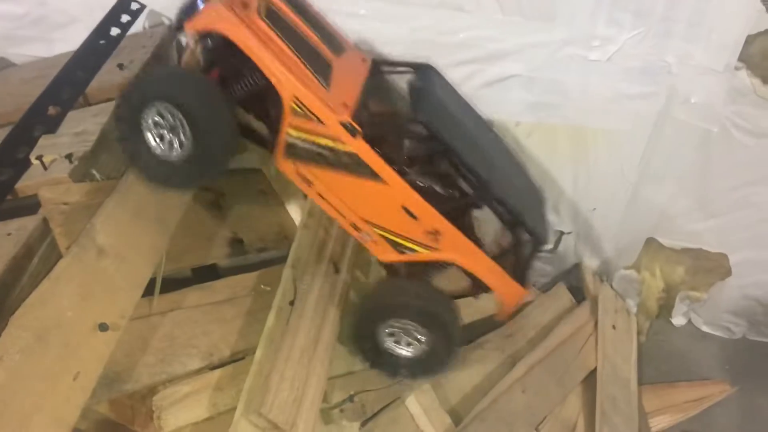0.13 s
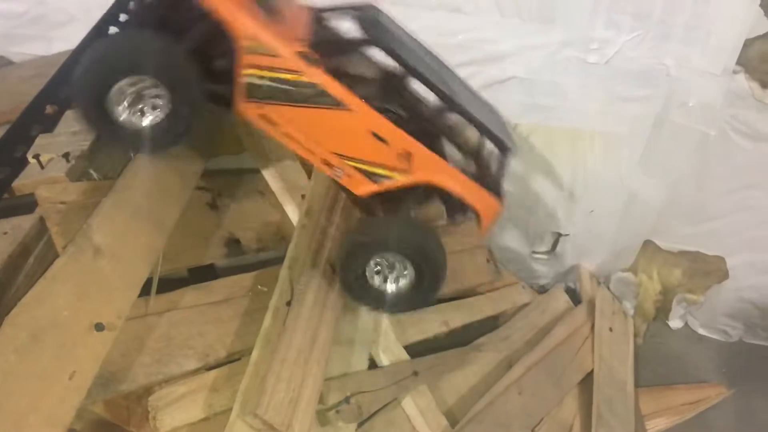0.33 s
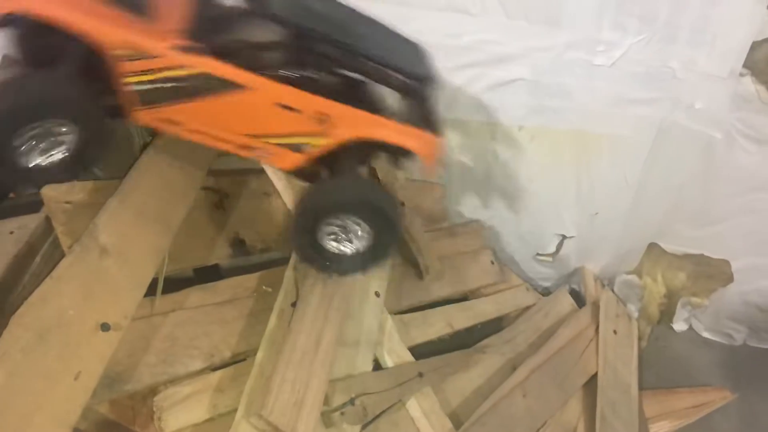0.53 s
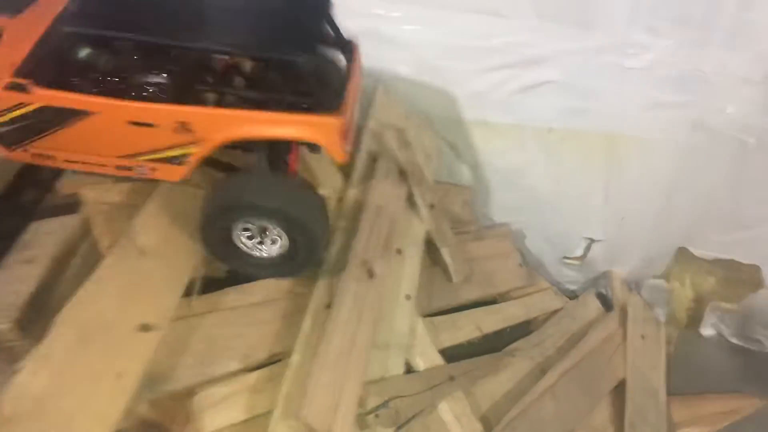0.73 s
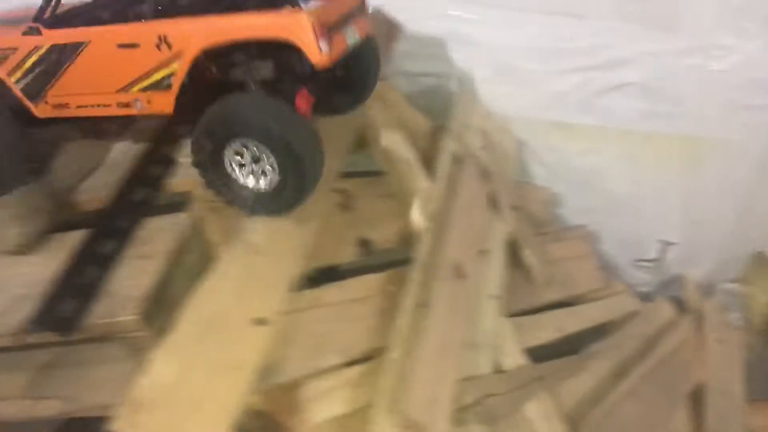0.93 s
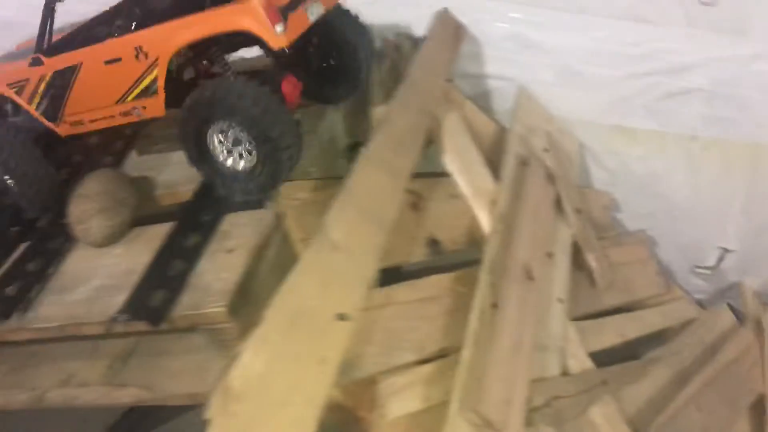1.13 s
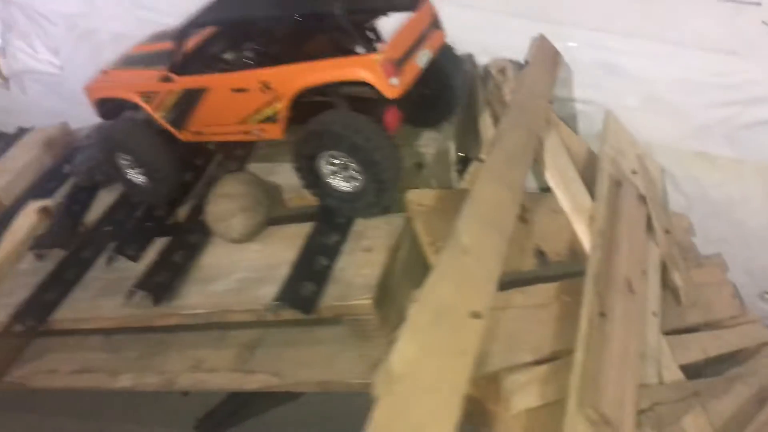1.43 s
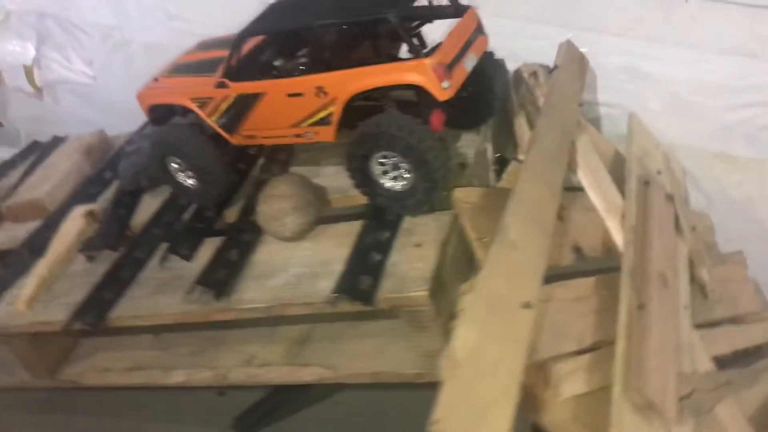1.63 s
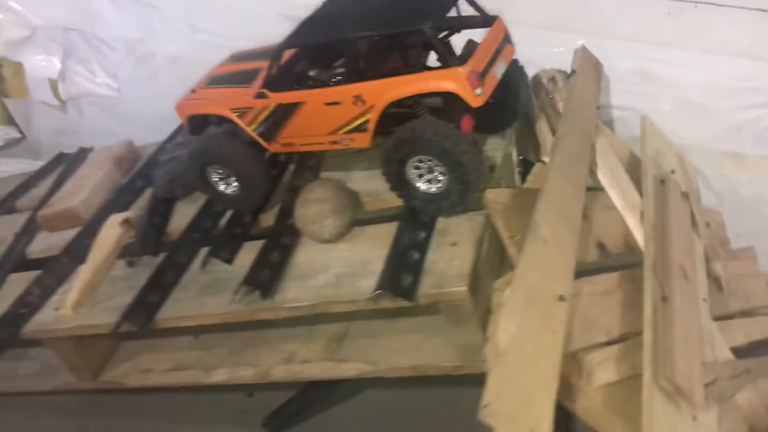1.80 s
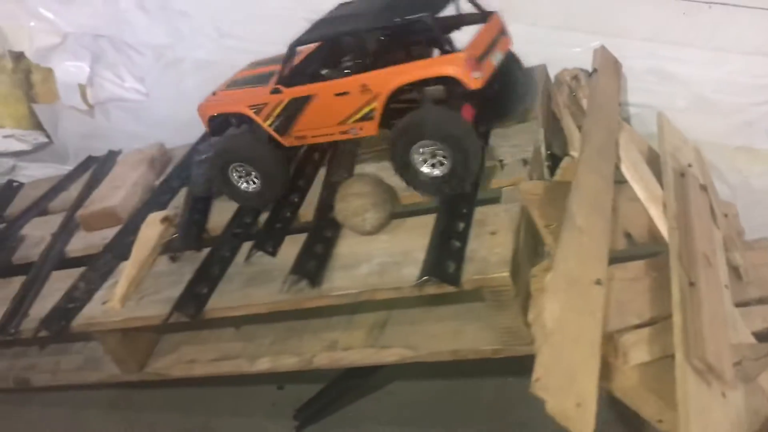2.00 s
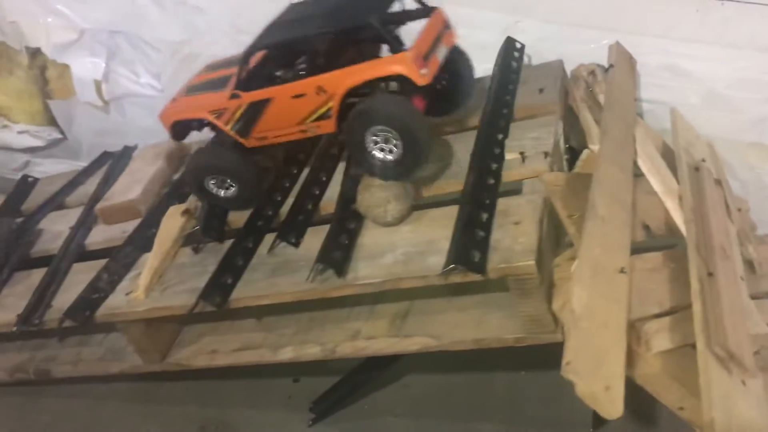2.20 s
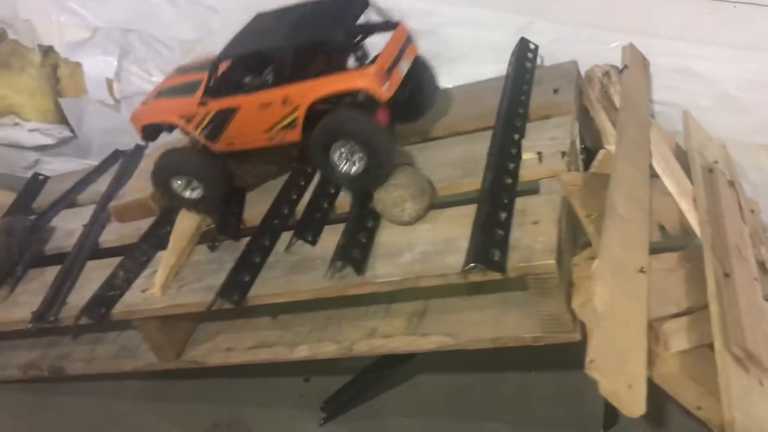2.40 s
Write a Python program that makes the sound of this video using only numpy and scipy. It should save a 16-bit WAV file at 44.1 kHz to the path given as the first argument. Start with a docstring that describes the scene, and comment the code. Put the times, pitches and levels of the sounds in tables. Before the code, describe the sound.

A toy truck's small motor and plastic gears whine and rattle unevenly, sag and wind down amid wooden knocks; after a quiet pause with a faint scuff, it restarts and clatters on boards, close in a basement.

```python
"""In a basement, a toy crawler climbs a heap of wooden offcuts, heard direct with a short room behind it.
Its motor and gears whine and rattle, sagging under load, then wind down; the truck drops onto the boards.
It rests with a brief scuff, starts again with a thin controller whistle and knocks against the blocks.
Gears are tones at the mesh rate plus random clashes; knocks are showers of clicks through filters and
ringing modes; tyres, scuff and air are filtered noise."""
import sys
import numpy as np
from scipy import signal
from scipy.fft import rfft, irfft
from scipy.io import wavfile

SR = 44100
rng = np.random.default_rng(int(sys.argv[2]) if len(sys.argv) > 2 else 0)


def materialize(psi):
    """Save the field psi as 16-bit PCM at rate SR to the path in sys.argv[1].

    A 1-D psi becomes a single channel; in a 2-D psi each row is a channel.
    """
    bounded = np.clip(np.atleast_2d(psi).T, -1, 1)
    quanta = np.round(bounded * 32767).astype(np.int16)
    wavfile.write(sys.argv[1], SR, quanta)


N = 112454
T = np.arange(N) / SR


def amp(db):
    """Decibels to gain."""
    return 10 ** (np.asarray(db) / 20)


def unit(x):
    """Scales to an rms of one."""
    return x / np.sqrt(np.mean(x ** 2) + 1e-20)


def read(points, hz):
    """Reads a curve on a log-frequency axis."""
    f, value = np.transpose(points)
    return np.interp(np.log(hz + 1), np.log(f + 1), value)


def add(mix, s, sound):
    """Mixes a sound in at time s."""
    part = mix[max(0, round(s * SR)):][:len(sound)]
    part += sound[:len(part)]


def noise():
    """White noise as long as the scene."""
    return rng.standard_normal(N)


def wander(hz):
    """Slow chance below about hz, with an rms of one."""
    low_pass = 1 + (np.fft.rfftfreq(N, 1 / SR) / hz) ** 4
    return unit(irfft(rfft(noise()) / low_pass, N))


def colour(x, points, size=4096):
    """Causal (minimum-phase) filter of unit energy with the shape of the given spectrum."""
    log_gain = np.log(amp(read(points, abs(np.fft.fftfreq(size, 1 / SR)))))
    spectrum = np.exp(np.conj(signal.hilbert(log_gain)))
    taps = np.fft.ifft(spectrum).real[:size // 2]
    return signal.fftconvolve(x, taps / np.linalg.norm(taps))[:N]


def ring(x, modes):
    """Rings a set of damped modes, with unit energy."""
    t = T[:SR // 3]
    taps = sum(amp(db - 60 * t / t60) * np.sin(2 * np.pi * hz * t) for hz, db, t60 in modes)
    return signal.fftconvolve(x, taps / np.linalg.norm(taps))[:N]


# multiples of the gear mesh rate, from the first up: relative level_db
MESH_MULTIPLES = [-1, 1, -7, -10.5]
# gearbox and shell resonances the whine sings through: freq_hz, gain_db
SHELL_COLOUR = [(700, -20), (1200, -0.5), (1450, 7), (1850, -31.5), (2100, 5), (2280, 3.5), (2700, -10),
                (3550, -1.5), (3900, -16), (4500, -4)]
# second gear stage, heard as its rate glides through the shell: freq_hz, gain_db
SECOND_STAGE_COLOUR = [(750, -24), (1020, 0), (1130, -18)]
SECOND_STAGE_RATIO = .94  # its rate as a share of the mesh rate
SIDEBANDS, BLUR = .18, .08  # phase wobble, radians before scaling
FLUTTER_DB = 2  # rms level flutter of each multiple


def gear_whine(hz, mesh, shaft):
    """Meshing teeth sound multiples of the mesh rate; shaft wobble adds sidebands; a second stage joins in."""
    wobble = SIDEBANDS * (np.sin(shaft) + wander(hz=233))
    whine = np.zeros(N)
    for k, db in enumerate(MESH_MULTIPLES, 1):
        level_db = db + read(SHELL_COLOUR, k * hz) + FLUTTER_DB * wander(hz=95)
        phase = k * (mesh + wobble / 2 + BLUR * wander(hz=146))
        whine += amp(level_db) * np.sin(phase)
    second_level = amp(read(SECOND_STAGE_COLOUR, SECOND_STAGE_RATIO * hz))
    return whine + second_level * np.sin(SECOND_STAGE_RATIO * mesh)


WEAR_FLUTTER_DB = 10  # greatest rise or fall of one shaft multiple


def worn_teeth(shaft, count=56):
    """Uneven teeth repeat every turn: a comb of shaft multiples glides with the speed, each swelling and fading."""
    comb = np.zeros(N)
    for k in range(2, count):
        flutter = amp(WEAR_FLUTTER_DB * np.tanh(wander(hz=29) / 2))
        comb += flutter * np.sin(k * shaft + 2 * np.pi * rng.random())
    return comb


# colour of clashing teeth: freq_hz, gain_db
TEETH_COLOUR = [(150, -29), (600, -12.5), (850, -5), (1500, 0), (1850, -7.5), (2400, -3), (3100, -7),
                (4300, -8.5), (5600, -11), (7400, -20.5), (8600, -18), (10500, -24), (15500, -36)]
CLASH_PER_S, CLASH_DB = 2600, 3.  # mean rate; random extra level, mean before a cap at three times this
TURN_DEPTH = .4  # swell of the clashes over one shaft turn
WEAR_DB, LURCH_DB = 2, 1.2  # worn-tooth comb relative to the clashes; rms level flutter of both


def gear_rattle(shaft):
    """Teeth clash at random, swelling once per shaft turn, over the buzz of their wear."""
    clashes = (rng.random(N) < CLASH_PER_S / SR) * rng.choice([-1, 1], N)
    clashes = clashes * amp(CLASH_DB * np.minimum(rng.exponential(1, N), 3))
    clashes *= 1 + TURN_DEPTH * np.sin(shaft)
    buzz = amp(WEAR_DB) * unit(colour(worn_teeth(shaft), TEETH_COLOUR))
    return unit((unit(colour(clashes, TEETH_COLOUR)) + buzz) * amp(LURCH_DB * wander(hz=42.0)))


# the drive as load and throttle change: time_s, mesh_hz, whine_db (before the truck's gain)
DRIVE_COURSE = [(0, 1026, -26.5), (.04, 1151, -34), (.068, 1177, -21.5), (.082, 1118, -34),
                (.125, 1018, -47), (.152, 1123, -26.5), (.17, 1128, -38.5), (.188, 1102, -29.5),
                (.24, 966, -39.5), (.28, 1122, -28.5), (.31, 1069, -36.5), (.355, 909.5, -45),
                (.385, 1081, -32.5), (.41, 1121, -25.5), (.44, 1031, -38.5), (.472, 968, -41),
                (.503, 1108, -28.5), (.555, 1180, -30.5), (.582, 1194, -23), (.625, 1132, -53.5),
                (.672, 1196, -23.5), (.7, 1146, -33.5), (.718, 1094, -28.5), (.738, 1177, -42),
                (.78, 1224, -24.5), (.82, 1029, -43), (.838, 830, -26.5), (.863, 710.7, -28.5),
                (.88, 678, -40), (.925, 629.5, -34.5), (.955, 572, -34.5), (1.0, 501, -47),
                (1.07, 578, -37), (1.125, 669.7, -36), (1.16, 698.8, -47.5), (1.2, 605, -37),
                (1.8, 348.4, -130), (1.97, 479.2, -59), (2.01, 689, -39.5), (2.021, 725.3, -32),
                (2.055, 810.7, -34), (2.17, 868, -39), (2.34, 617.3, -54), (2.43, 671, -41.5),
                (2.55, 643, -87)]
# rattle of the gear train: time_s, level_db (before the truck's gain)
RATTLE_COURSE = [(0, -30.5), (.08, -31), (.3, -30), (.36, -34), (.42, -29), (.475, -32.5), (.6, -29),
                 (.83, -32), (.96, -40), (1.0, -46.5), (1.12, -40), (1.2, -39), (1.38, -60), (1.81, -66),
                 (1.85, -58.5), (1.975, -51.5), (2.02, -38), (2.1, -38.5), (2.17, -38), (2.42, -43),
                 (2.49, -33), (2.55, -45.5)]
TEETH = 6  # mesh cycles per shaft turn
JITTER = .005  # rms share of the mesh rate


def drive():
    """Motor speed sets the mesh and shaft phases; whine and rattle follow their own level courses."""
    time_s, mesh_hz, whine_db = np.transpose(DRIVE_COURSE)
    hz = np.interp(T, time_s, mesh_hz) * (1 + JITTER * wander(hz=118.5))
    mesh = 2 * np.pi * np.cumsum(hz) / SR
    shaft = mesh / TEETH
    whine = gear_whine(hz, mesh, shaft) * amp(np.interp(T, time_s, whine_db))
    return whine + gear_rattle(shaft) * amp(np.interp(T, *np.transpose(RATTLE_COURSE)))


# bright plastic colour of grit, and of snaps in the knocks: freq_hz, gain_db
PLASTIC_COLOUR = [(1000, -25), (3000, -8), (5500, -2), (8000, -3), (12000, 0), (15500, -3)]
GRIT_PER_S, GRIT_DB = 940, -18  # mean rate; level relative to the gear rattle
GRIT_SPREAD_DB, GRIT_CLUMP_DB = -10, 5  # mean drop of a tick; greatest swell of a clump


def grit():
    """Links and shell scrape and tick in clumps, as hard as the drive shakes them."""
    ticks = (rng.random(N) < GRIT_PER_S / SR) * amp(GRIT_SPREAD_DB * rng.exponential(1, N))
    scrapes = signal.fftconvolve(ticks, np.exp(-T / 0.0019))[:N] * noise()
    clumps = scrapes * amp(GRIT_CLUMP_DB * np.tanh(wander(hz=12)))
    level_db = np.interp(T, *np.transpose(RATTLE_COURSE)) + GRIT_DB
    return unit(colour(clumps, PLASTIC_COLOUR)) * amp(level_db)


CLATTER_PER_S = 2700  # mean rate of rebounds


def clatter(length, size=8192):
    """A contact followed by a dying shower of small rebounds, with the same energy at any length."""
    t = np.arange(size) / SR
    fade = np.exp(-(t / length) ** 2 / 2)
    hits = rng.choice([-1, 1], size) * (rng.random(size) < CLATTER_PER_S / SR) * fade
    hits[0] = 1.0
    return hits / np.linalg.norm(hits) * np.sqrt(SR / 50)


# knocks of chassis and wheels, drive levels into the filters:
# start_s, strike_db, thud_db, snap_db, clatter_length_s, part_pitch_hz, part_db
KNOCK_LIST = [(.003, -29.5, -71, -67, 0.033, 1203, -27), (0.087, -32.5, -76, -68, 0.0098, 1230, -30.5),
              (0.449, -29.5, -69, -50, 0.016, 1965, -33), (0.608, -32, -36.5, -36, 0.012, 610, -43),
              (0.798, -35.5, -40.5, -42, 0.013, 1110, -38), (1.039, -32.5, -38.5, -63, 0.018, 1116, -32.5),
              (1.079, -31, -35.5, -49, 0.022, 1815, -26), (1.208, -37.5, -66, -49, 0.0059, 2664, -55),
              (1.229, -31, -34.5, -34, 0.017, 724, -41.5), (1.831, -61, -79, -66, 0.0053, 1404, -54),
              (1.98, -66, -71, -71, 0.0097, 1498, -47.5), (2.199, -31.5, -33, -48, 0.013, 504, -42),
              (2.211, -21.5, -29.5, -43, 0.032, 3170, -29), (2.368, -30, -40, -53, 0.022, 980, -39),
              (2.413, -29.5, -41.5, -48.5, 0.024, 1349, -37), (2.46, -33.5, -34, -49, 0.065, 1041, -39)]
# light ticks of plastic, halved when played: start_s, level_db
TICK_LIST = [(.257, -36.5), (0.614, -33), (.864, -44), (1.019, -39), (1.056, -37), (1.096, -36),
             (1.271, -41.5), (2.012, -62), (2.073, -55), (2.157, -46), (2.172, -45), (2.547, -34.5)]
# chassis strike: freq_hz, gain_db
STRIKE_COLOUR = [(200, -37), (500, -12), (1700, 3.5), (2400, -1.5), (4300, -2), (6000, -10), (9000, -19),
                 (15000, -84)]
# board thud: freq_hz, gain_db
THUD_COLOUR = [(40, -62), (90, -12), (260, -5), (800, -5.5), (1500, -36.5), (4000, -59)]
# ring of the boards: pitch_hz, relative level_db, t60_s
BOARD_MODES = [(292, -3, 0.1), (468, -4, 0.052), (725, 4.5, 0.14), (1719, 12, 0.094), (2710, 7, 0.041),
               (5010, 11.5, 0.08)]
BOARD_RING_DB = -10.5
PART_SPREAD, PART_T60_S = .09, .05  # pitch step as a share of the part's pitch; its ring


def knocks():
    """Each knock rattles the chassis, rings the struck part, thuds in the boards and snaps the plastic shell."""
    strike, thud, snap, parts = np.zeros((4, N))
    for s, strike_db, thud_db, snap_db, length, pitch_hz, part_db in KNOCK_LIST:
        add(strike, s, amp(strike_db) * clatter(length))
        add(thud, s, amp(thud_db) * clatter(length))
        add(snap, s, amp(snap_db) * clatter(length))
        cluster = [(pitch_hz * (1 + PART_SPREAD * k), 0, PART_T60_S) for k in (-1, 0, 1)]
        add(parts, s, amp(part_db) * ring(clatter(length / 2), cluster))
    for s, db in TICK_LIST:
        add(snap, s, amp(db) * clatter(0.0055) * .5)
    chassis = colour(strike, STRIKE_COLOUR)
    boards = amp(BOARD_RING_DB) * ring(strike, BOARD_MODES)
    return chassis + boards + parts + colour(thud, THUD_COLOUR) + colour(snap, PLASTIC_COLOUR)


# tyres bumping over board edges: peak_s, level_db (before the truck's gain), length_s
BUMP_LIST = [(0.066, -51, 0.025), (0.297, -50, 0.081), (0.619, -41, 0.031), (0.817, -48, 0.048),
             (0.92, -54, 0.12), (1.261, -54, 0.093), (2.171, -46, 0.034), (2.452, -49.5, 0.073)]
# low rumble of the rubber: freq_hz, gain_db
TYRE_COLOUR = [(35, -16), (70, -3), (105, -0.5), (145, 2), (190, -5.5), (400, -8), (900, -62)]


def tyres():
    """Rubber lugs rumble on loose boards: low noise swelling around each bump."""
    level = sum(amp(db) * np.exp(1 - np.hypot(1, (T - s) / length)) for s, db, length in BUMP_LIST)
    return unit(colour(noise(), TYRE_COLOUR)) * level


# pings of the steel rails under the truck: start_s, pitch_hz, level_db (before the truck's gain), t60_s
PING_LIST = [(.086, 3970, -32.5, 0.11), (0.319, 2930, -22, 0.04), (1.04, 2660, -26, 0.14)]


def rails():
    """A grazed steel rail rings on one short note."""
    out = np.zeros(N)
    for s, hz, db, t60 in PING_LIST:
        add(out, s, amp(db - 60 * T / t60) * np.sin(2 * np.pi * hz * T))
    return out


# controller whistle: start_s, end_s, level_db (before its flutter)
WHISTLE_LIST = [(.84, 1.2, -61), (1.78, 1.93, -74), (1.92, 2.12, -64)]
SWITCH_HZ = 8000


def controller():
    """The motor windings whistle at the controller's switching rate, with a fluttering level."""
    level = np.zeros(N)
    for start, end, db in WHISTLE_LIST:
        level += amp(db) * np.clip(np.minimum(T - start, end - T) / 0.01, 0, 1)  # 10 ms fades
    return level * amp(5.15 * wander(hz=59.95)) * np.sin(2 * np.pi * SWITCH_HZ * T)


# hiss of the scuff: freq_hz, gain_db
SCUFF_COLOUR = [(1500, -12), (2700, -7), (4800, -10), (6100, 6), (7600, -18), (9500, -11.5), (15500, -27)]
SCUFF_S, SCUFF_DB = 1.6675, -38.5  # peak time; level before the truck's gain
SCUFF_RISE_S, SCUFF_FALL_S = 0.015, 0.015


def scuff():
    """A brief hiss, as of a tyre slipping while the truck settles."""
    width = np.where(T < SCUFF_S, SCUFF_RISE_S, SCUFF_FALL_S)
    swell = np.exp(1 - np.hypot(1, (T - SCUFF_S) / width))
    return amp(SCUFF_DB) * swell * unit(colour(noise(), SCUFF_COLOUR))


# decay of the basement: freq_hz, t60_s
ROOM_DECAY = [(100, 0.17), (500, 1), (2000, 0.32)]
EARLY_DB, TAIL_DB = -11.5, -10  # relative to the direct sound


def basement(x, count=9, size=256):
    """Early echoes from boards and wall, then a short tail whose decay depends on frequency."""
    early = np.zeros(SR // 60)
    signs = rng.choice([-1, 1], count)
    early[rng.integers(SR // 700, len(early), count)] = signs / np.sqrt(count)
    onset = np.clip(T[:SR // 2] / 0.013 - .5, 0, 1)
    taps = rng.standard_normal(SR // 2) * (rng.random(SR // 2) < .1) * onset  # sparse noise
    hz, t, z = signal.stft(taps, SR, nperseg=size)
    decay = amp(-60 * t / read(ROOM_DECAY, hz)[:, None])
    tail = signal.istft(z * decay, SR, nperseg=size)[1]
    echoes = amp(EARLY_DB) * signal.fftconvolve(x, early)[:N]
    return x + echoes + amp(TAIL_DB) * signal.fftconvolve(x, tail / np.linalg.norm(tail))[:N]


# still air of the room: freq_hz, gain_db
AIR_COLOUR = [(25, -25), (60, -3.5), (120, -13.5), (300, -13.5), (1200, -10), (2200, -24), (5000, -24),
              (9000, -29), (15000, -36)]
AIR_DB, TRUCK_DB = -61, -2.5


def scene():
    """The truck in the room and its dry controller whistle, over still air."""
    truck = basement(drive() + grit() + tyres() + knocks() + rails() + scuff())
    whistle = controller()
    air = amp(AIR_DB) * unit(colour(noise(), AIR_COLOUR))
    return (amp(TRUCK_DB) * truck + whistle + air)[None]


LOW_CUT_HZ, EDGE_HZ = 33, 15750


def record(dry):
    """The microphone's bass roll-off and the recorder's band limit."""
    roll_off = signal.butter(2, LOW_CUT_HZ, "highpass", fs=SR, output="sos")
    lean = signal.sosfilt(roll_off, dry)
    band_limit = signal.firwin(511, EDGE_HZ, window=("kaiser", 9), fs=SR)
    return signal.oaconvolve(lean, band_limit[None], "same")


dry = scene()
out = record(dry)
materialize(out)
```